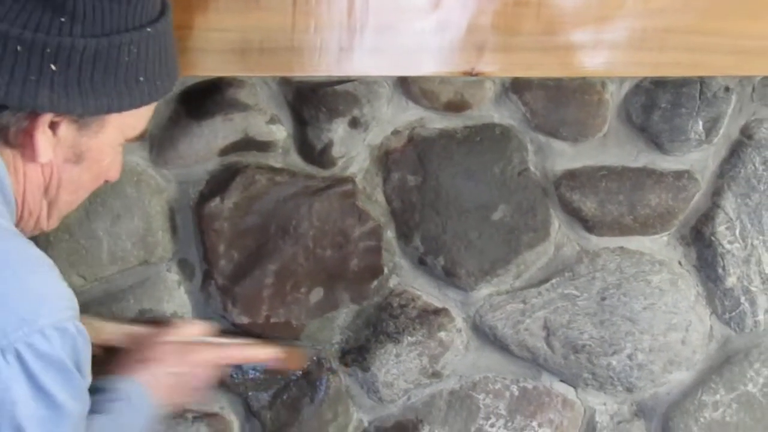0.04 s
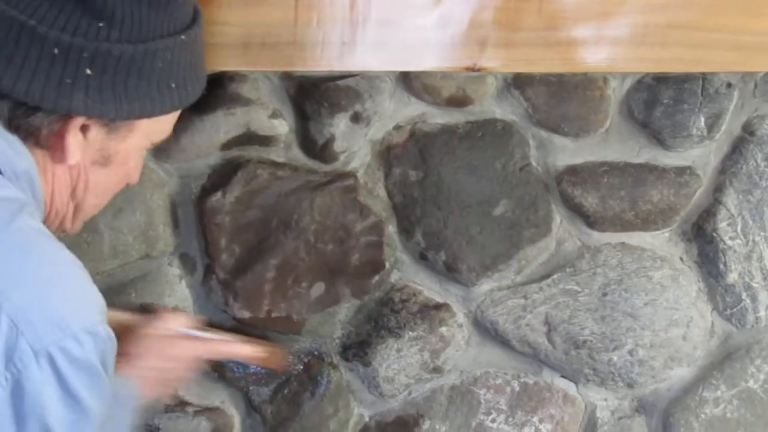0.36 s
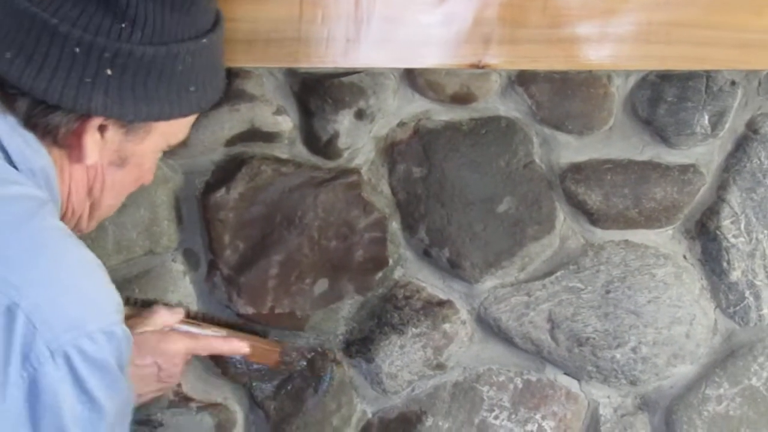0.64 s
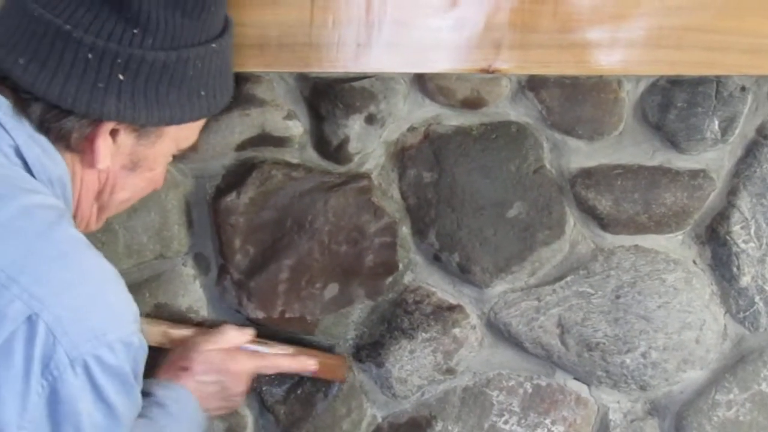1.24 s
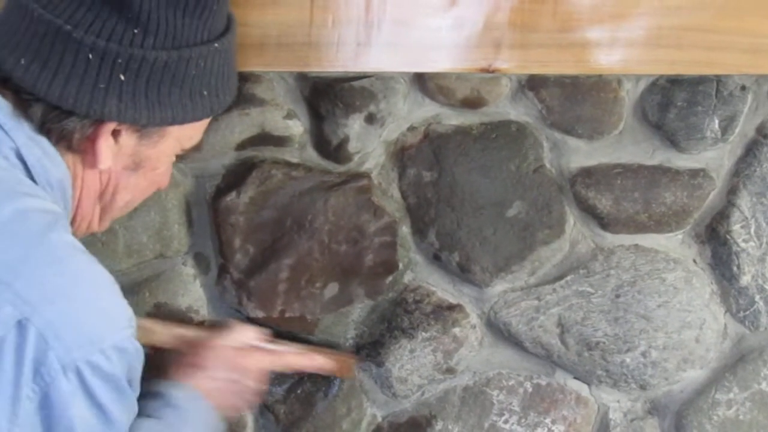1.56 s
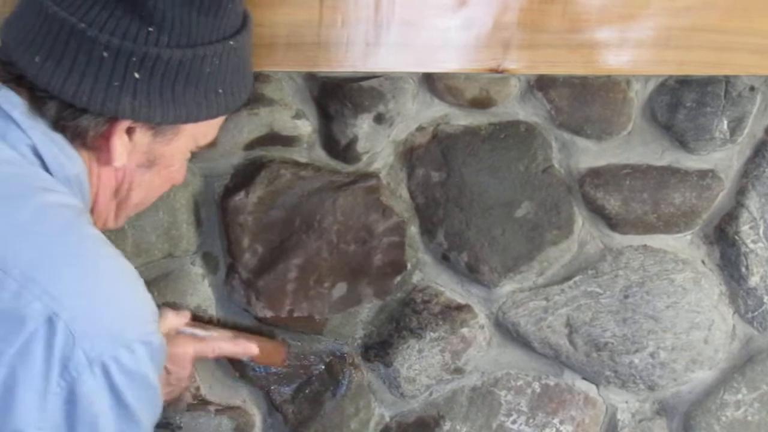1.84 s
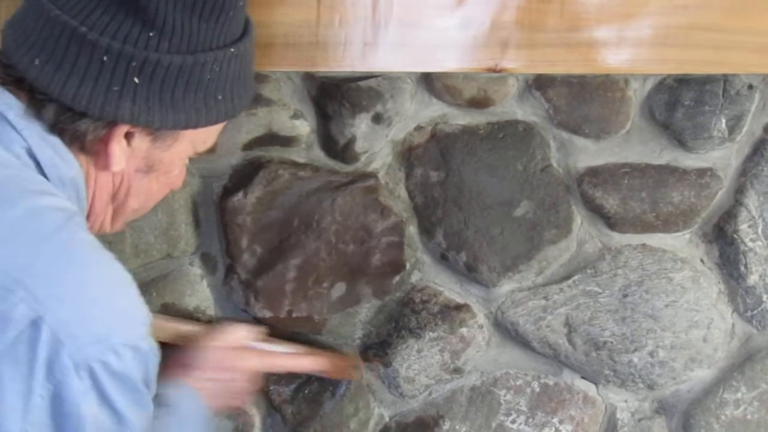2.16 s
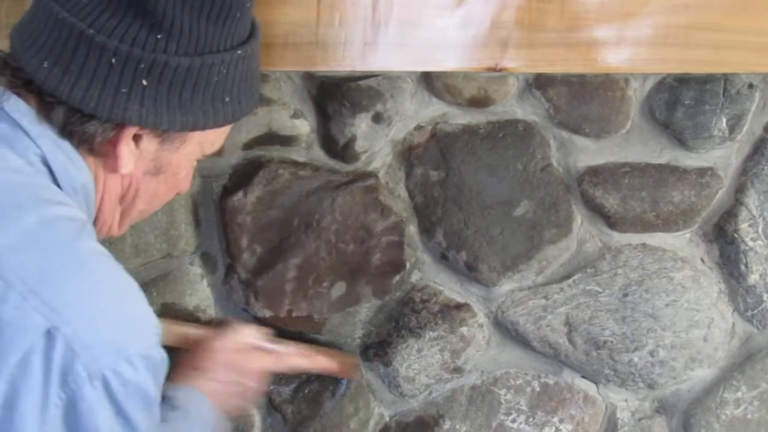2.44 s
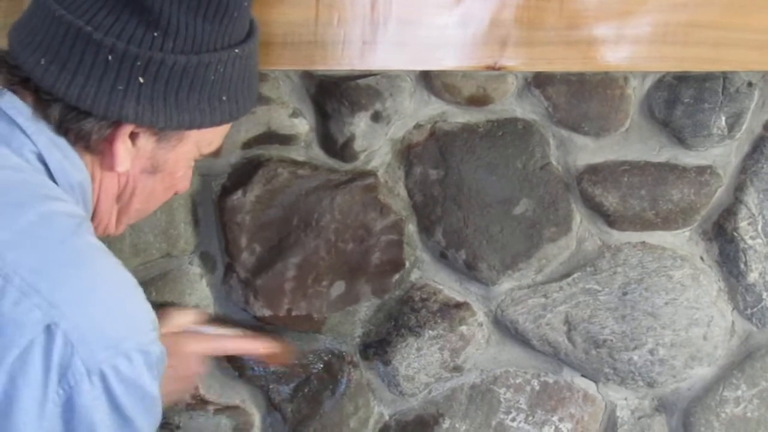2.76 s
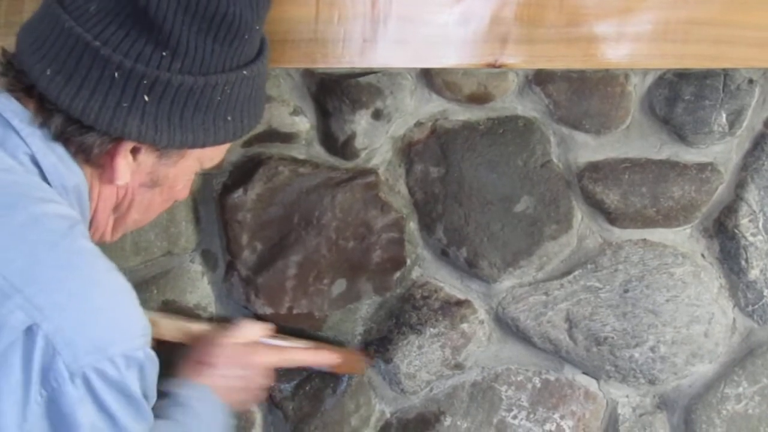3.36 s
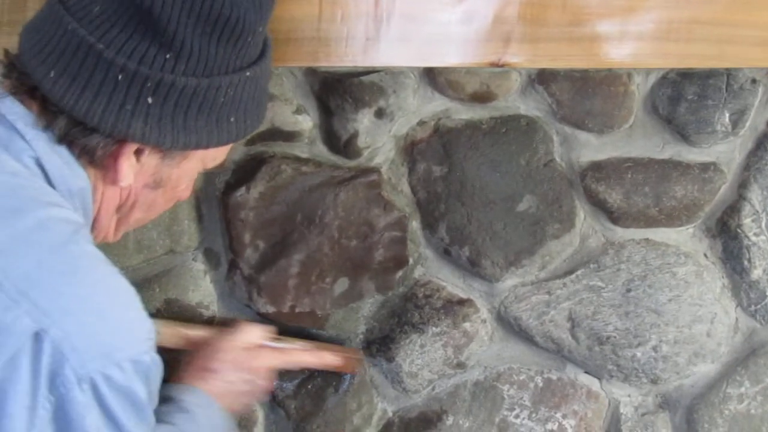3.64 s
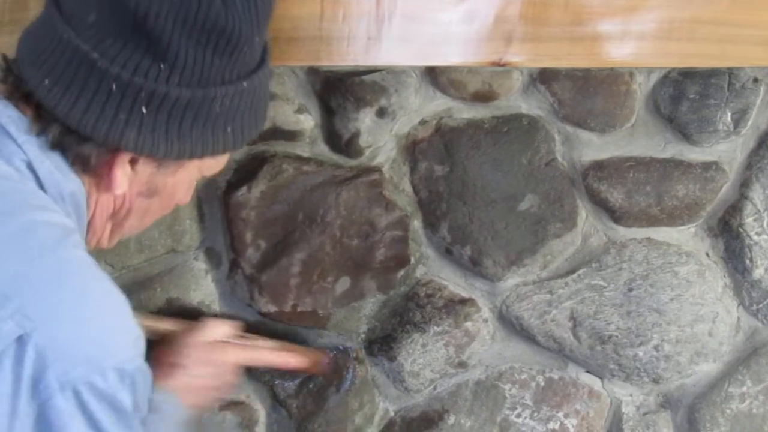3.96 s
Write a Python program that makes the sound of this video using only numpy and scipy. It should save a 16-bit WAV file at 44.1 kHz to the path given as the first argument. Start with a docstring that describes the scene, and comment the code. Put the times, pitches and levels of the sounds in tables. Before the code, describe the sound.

Stiff bristles scratch quickly back and forth over stone without a pause, biting harder on each push and sometimes snapping free with tiny clicks. The scrubbing is close and hissy, outdoors, over faint air and a weak hum.

```python
"""A stiff hand brush scrubs a rough stone wall, five strokes a second, close to a mono camera microphone.
Bristle tips catch and slip on the grit: a rasp in the brush block and a bright hiss, both following
the hand's speed. On each push the bent bristles spring over and bite harder; single ones snap free.
Wall and ground return a short echo. Behind are faint outdoor air, a weak hum and one low blip."""
import sys
import numpy as np
from scipy import signal
from scipy.fft import rfft, irfft
from scipy.io import wavfile

SR = 44100
rng = np.random.default_rng(int(sys.argv[2]) if len(sys.argv) > 2 else 0)


def unload_audio(sound):
    """Save the sound as a 16-bit wav file, at the path given as the first command line argument."""
    columns = np.transpose(np.atleast_2d(sound))
    # keep every value between -1 and 1, then stretch to whole-number steps
    steps = np.round(np.clip(columns, -1, 1) * 32767)
    wavfile.write(sys.argv[1], SR, steps.astype(np.int16))


N = 176400
TIME, FREQ = np.arange(N) / SR, np.fft.rfftfreq(4096, 1 / SR)


# Hand strokes, push and pull in turn: start_s, end_s, rasp_db, hiss_db
STROKES = [(0.02, 0.213, -39, -29.5), (0.222, 0.355, -39, -28), (0.382, 0.557, -38.5, -29.0),
           (0.556, 0.69, -38.5, -27.5), (0.713, 0.895, -38.5, -28), (0.884, 1.061, -37.5, -25.5),
           (1.061, 1.251, -37.5, -27), (1.296, 1.465, -38.5, -26), (1.486, 1.694, -37.5, -28),
           (1.705, 1.905, -37, -24.5), (1.922, 2.14, -37, -30), (2.15, 2.345, -37, -26),
           (2.374, 2.58, -37, -26.5), (2.579, 2.778, -37, -25.5), (2.796, 2.992, -37.5, -26.5),
           (2.984, 3.182, -38, -25.1), (3.185, 3.396, -38.5, -29), (3.388, 3.556, -36, -26.5),
           (3.564, 3.774, -38, -26.7), (3.77, 3.941, -37.5, -27.5), (3.961, 4.146, -35.9, -25.5)]
# Spectra of the block's rasp and the tips' hiss: frequency_hz, relative_db
RASP_SPECTRUM = [(100, -30.5), (250, -10.5), (500, -11.5), (800, -8), (1200, -5.5), (1900, -4.5),
                 (2400, -1.5), (3200, -1), (3650, -4), (4400, -3), (6000, -7.5), (9000, -5), (15000, -23.5)]
HISS_SPECTRUM = [(500, -40), (2500, -28.5), (4000, -11), (5300, -4.5), (7000, -3.5), (8700, 0), (10300, 2),
                 (11500, 0), (13000, -3.5), (14000, -9), (15000, -9.5)]
# Resonances of the brush block: pitch_hz, width_hz, lift_db
BLOCK_MODES = [(730, 60, 2), (1280, 80, 2), (1590, 110, 3), (2720, 250, 1.5), (3260, 220, 2.5),
               (4400, 350, 3), (5330, 250, 1)]

def brush(rasp_trim_db=0.73, hiss_trim_db=-1.12):
    """Close to the microphone, bristles drag over stone, louder as the hand speeds up in each stroke."""
    rasp_power, hiss_power = amp(-49.5) ** 2, amp(-37.5) ** 2  # some drag stays at the turns
    for start, end, rasp_db, hiss_db in STROKES:
        travel = np.clip((TIME - start) / (end - start), 0, 1)
        rasp_swell = abs(np.sin(np.pi * travel ** 0.92)) ** 0.72  # peaks a little early
        rasp_power += (amp(rasp_db) * rasp_swell) ** 2
        hiss_power += (amp(hiss_db) * np.sin(np.pi * travel)) ** 2
    stone = amp(0.66 * drift(hz=35) + 0.4 * drift(hz=350))  # bumps and grit shake the level
    rasp = amp(rasp_trim_db) * np.sqrt(rasp_power) * slips(stone, per_s=5000) + grips()
    hiss = amp(hiss_trim_db) * np.sqrt(hiss_power) * slips(stone, per_s=9000)
    friction = colour(rasp, RASP_SPECTRUM, BLOCK_MODES) + colour(hiss, HISS_SPECTRUM, BLOCK_MODES)
    return friction + bites(stone) + block_ring(rasp) + snaps()


def slips(stone, per_s, spread_db=2, contact_s=.09, ring_s=0.0039, ring_share=0.093):
    """Bristle tips click; tuft after tuft takes its turn on the stone, each ringing in its own way."""
    hop, t = round(contact_s * SR / 2), TIME[:len(FREQ)]
    lead = rng.integers(hop, 2 * hop)
    out, contact = np.zeros(N + SR), signal.windows.cosine(2 * hop)
    for at in range(0, N + 2 * hop, hop):
        size = amp(spread_db * np.minimum(rng.exponential(1, 2 * hop), 4.5))
        clicks = size * rng.choice([-1, 1], 2 * hop) * (rng.random(2 * hop) < per_s / SR)
        ring = rng.standard_normal(len(t)) * np.exp(-t / ring_s)
        ring *= np.sqrt(ring_share) / np.linalg.norm(ring)
        ring[0] += np.sqrt(1 - ring_share)  # the bare click
        tuft = signal.fftconvolve(clicks * contact, ring)
        out[at:at + len(tuft)] += tuft
    return unit(stone * out[lead:lead + N])


# Bristles biting in mid push: start_s, hold_s, level_db
BITES = [(0.105, 0.041, -25), (0.448, 0.035, -23.5), (0.775, 0.038, -24), (1.153, 0.055, -27.5),
         (1.553, 0.08, -24), (2.002, 0.082, -23), (2.451, 0.066, -23.5), (2.863, 0.067, -23.5),
         (3.277, 0.048, -24), (3.649, 0.051, -24)]
# Spectrum of a bite: frequency_hz, relative_db
BITE_SPECTRUM = [(500, -30.5), (2500, -18.5), (4500, -11.5), (7000, -5.5), (8700, -0.5), (10500, 2.5),
                 (12000, 0.5), (13200, -1.5), (14000, -5.5), (15000, -18.5)]

def bites(stone, rise_s=.009, fall_s=0.018):
    """On each push the bent bristles spring over and bite harder into the wall."""
    level = np.zeros(N)
    for start, hold, db in BITES:
        rise = np.clip((TIME - start) / rise_s, 0, 1)
        fall = np.exp(-np.maximum(TIME - start - hold, 0) / fall_s)
        level += amp(db) * rise * fall
    return colour(level * slips(stone, per_s=7000), BITE_SPECTRUM)


# Single bristles snapping free: start_s, level_db, pitch_hz, decay_s
SNAPS = [(.0159, -29, 11300, 0.0034), (.2418, -23.5, 10200, 0.0025), (.3721, -27.5, 10700, 0.0035),
         (.461, -21, 10500, .001), (.8563, -17.5, 10500, .0012), (.8803, -19, 10500, .0012),
         (.9125, -21, 10600, 0.0022), (1.163, -13.5, 11400, 0.0028), (1.255, -27.5, 13900, .004),
         (1.565, -14, 10500, .001), (1.6794, -30, 8400, .003), (1.719, -26, 10500, 0.0011),
         (1.9154, -41, 10500, .002), (2.024, -15.5, 10500, 0.00091), (2.0838, -20, 11000, .0007),
         (2.1172, -24, 10500, .0006), (2.935, -44, 13000, .001), (2.9622, -12, 11900, 0.00081),
         (3.3894, -26, 8700, 0.0026)]

def snaps():
    """Each freed bristle gives one bright, quickly dying tick."""
    out, t = np.zeros(N), TIME[:len(FREQ)]
    for start, db, hz, decay_s in SNAPS:
        tick = amp(db) * np.exp(-t / decay_s) * resonate(rng.standard_normal(len(t)), hz, width_hz=4200)
        part = out[round(start * SR):][:len(t)]
        part += tick[:len(part)]
    return out


# Jolts of the block: start_s, level_db
GRIPS = [(.216, -40.5), (.574, -38.5), (1.314, -41.5), (1.743, -37), (2.166, -44), (2.8015, -39),
         (3.0145, -38), (3.4176, -46), (3.789, -46)]

def grips(decay_s=0.036):
    """The block jolts as a stroke grips: a short, dying cluster of slips."""
    level = sum(amp(db) * (TIME >= start) * np.exp(-abs(TIME - start) / decay_s) for start, db in GRIPS)
    return level * rng.choice([-1, 1], N)


# The block's main ring, moving as the grip shifts: time_s, pitch_hz, level_db
BLOCK_RING = [(0, 2380, -40.5), (.7, 2370, -43.5), (1.7, 2310, -47), (2.4, 2230, -46), (2.9, 2190, -41.5),
              (3.4, 2210, -43), (3.7, 2160, -42.5), (4, 2230, -44)]

def block_ring(rasp, main_trim_db=-6, pull_db=-8.5):
    """The rasp keeps the block's main resonance ringing; a higher one joins in on the pulls."""
    times, hz, db = np.transpose(BLOCK_RING)
    level = amp(main_trim_db + np.interp(TIME, times, db))
    main = resonate(rasp * rng.choice([-1, 1], N), np.interp(TIME, times, hz), width_hz=250)
    pulling = rasp * sum((TIME > start) & (TIME < end) for start, end, _, _ in STROKES[1::2])
    higher = resonate(pulling * rng.choice([-1, 1], N), hz=4470, width_hz=400)
    return level * main + amp(pull_db) * np.std(pulling) * higher


def echo(x, level_db=-12, t60_s=.12):
    """Wall and ground scatter a short, weak echo back to the microphone."""
    t = TIME[:SR // 2]
    tail = rng.standard_normal(len(t)) * np.exp(-np.log(1000) * t / t60_s)
    return amp(level_db) * signal.fftconvolve(x, tail / np.linalg.norm(tail))[:N]


# Spectrum of the open air: frequency_hz, relative_db
AIR_SPECTRUM = [(20, -3), (50, -5), (110, -1), (220, -0.5), (400, -2.5), (700, -7.5), (1500, -12.5),
                (5000, -26), (15000, -30)]

def air(level_db=-55.5):
    """Faint, steady outdoor air around the microphone."""
    return amp(level_db) * colour(rng.standard_normal(N), AIR_SPECTRUM)


# Swells of the hum: time_s, level_db
HUM_SWELLS = [(0, -62.5), (.8, -64.5), (1.1, -61), (1.45, -59), (1.7, -61), (2.55, -67.5), (2.74, -49.5),
              (2.9, -58), (3.05, -66), (3.4, -60.5), (3.6, -53), (4, -58)]

def hum(pitch_hz=310, wander_hz=7.13, waver_db=2.5):
    """A weak hum behind the brush wavers in level and pitch."""
    level = amp(np.interp(TIME, *np.transpose(HUM_SWELLS)))
    waver = amp(waver_db * drift(hz=9))
    hz = pitch_hz + wander_hz * drift(hz=18.5)
    return level * unit(waver * np.sin(2 * np.pi * np.cumsum(hz) / SR))


def blip(at_s=3.715, level_db=-33.5, pitch_hz=213, rise_hz_per_s=4200, width_s=.0095):
    """One short, low, rising blip in the background."""
    t = TIME - at_s
    cycles = pitch_hz * t + .5 * rise_hz_per_s * t ** 2
    return amp(level_db) * np.exp(-(t / width_s) ** 2) * np.sin(2 * np.pi * cycles)


def amp(db):
    """Decibels to gain."""
    return 10 ** (np.asarray(db) / 20)


def unit(x):
    """Scales to rms 1."""
    return x / np.sqrt(np.mean(x ** 2) + 1e-20)


def drift(hz):
    """Random wander of rms 1, up to about the given rate."""
    lowpass = np.exp(-.5 * (np.fft.rfftfreq(N, 1 / SR) / hz) ** 2)
    return unit(irfft(rfft(rng.standard_normal(N)) * lowpass, N))


def colour(x, spectrum, modes=()):
    """Shapes x by a spectrum and its resonances, through a causal filter of energy 1."""
    hz, db = np.transpose(spectrum)
    db = np.interp(np.log(FREQ + 1), np.log(hz), db)
    db += sum(lift / (1 + (2 * (FREQ - pitch) / width) ** 2) for pitch, width, lift in modes)
    log_gain = np.log(amp(np.r_[db, db[-2:0:-1]]))
    minimum_phase = np.exp(np.conj(signal.hilbert(log_gain)))
    taps = np.fft.ifft(minimum_phase).real[:len(FREQ)]
    return signal.fftconvolve(x, taps / np.linalg.norm(taps))[:N]


def resonate(x, hz, width_hz):
    """A steep resonance of two poles, each width_hz wide, that can follow a pitch curve; rms 1."""
    turn = np.exp(2j * np.pi * np.cumsum(hz * np.ones(len(x))) / SR)
    pole = np.exp(-np.pi * width_hz / SR)
    return unit((turn * signal.lfilter([1], [1, -2 * pole, pole * pole], x / turn)).real)


def scene():
    """At the wall: the brush up close, its echo and the background, the same in both channels."""
    scrub = brush()
    return np.tile(scrub + echo(scrub) + air() + hum() + blip(), (2, 1))


def record(dry, notch_hz=7870, edge_hz=15030):
    """The camera has one narrow notch in the treble and a steep band limit."""
    notched = signal.lfilter(*signal.iirnotch(notch_hz, Q=42, fs=SR), dry)
    lowpass = signal.firwin(1023, edge_hz, window=("kaiser", 9), fs=SR)
    return signal.oaconvolve(notched, lowpass[None], "same")


dry = scene()
out = record(dry)
unload_audio(out)
```